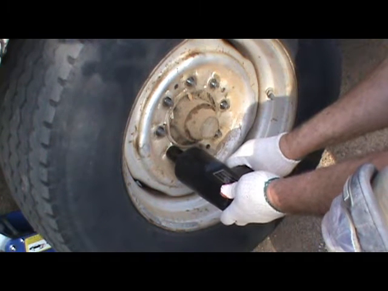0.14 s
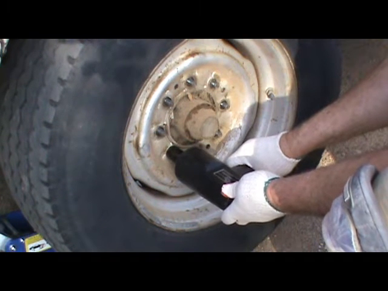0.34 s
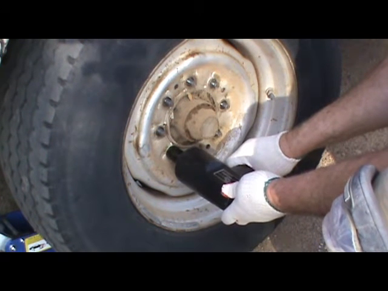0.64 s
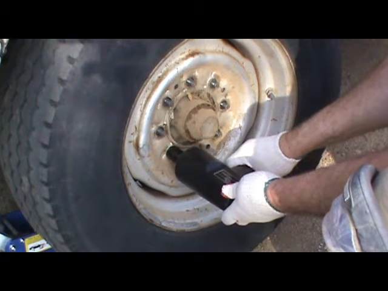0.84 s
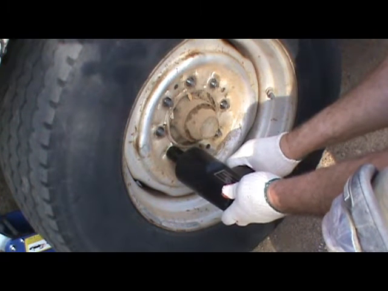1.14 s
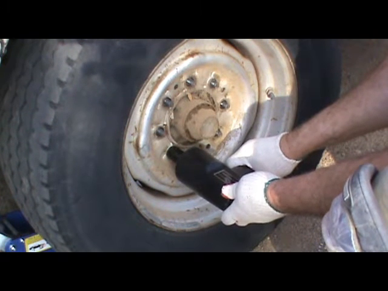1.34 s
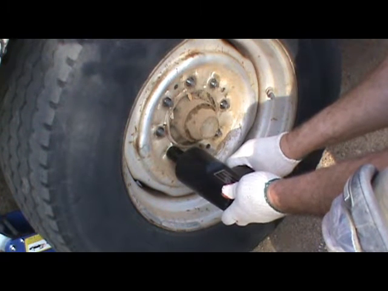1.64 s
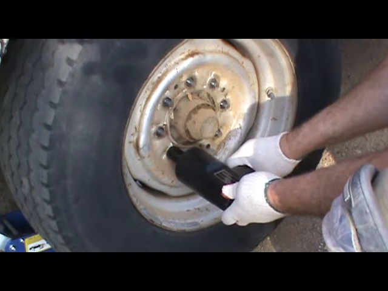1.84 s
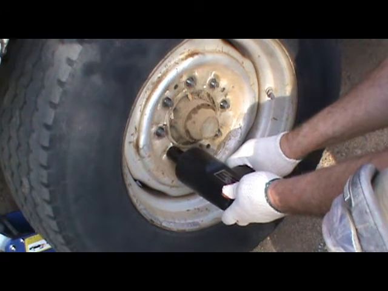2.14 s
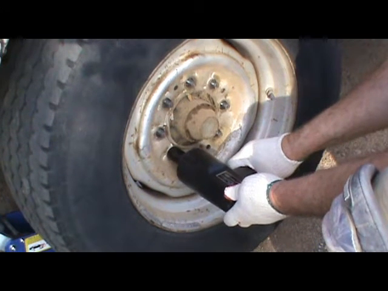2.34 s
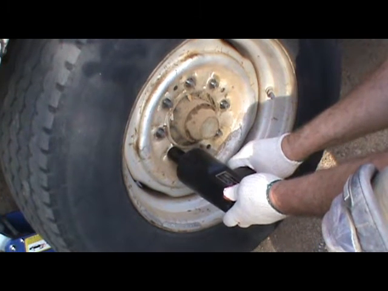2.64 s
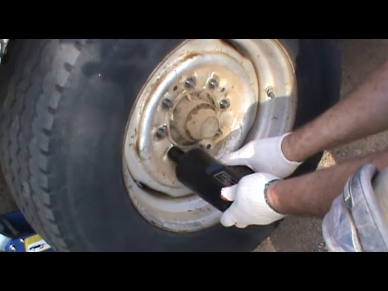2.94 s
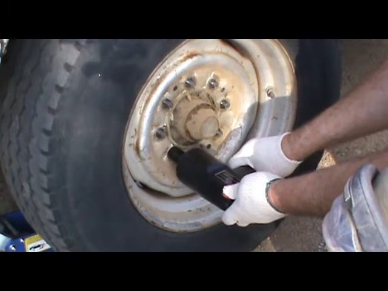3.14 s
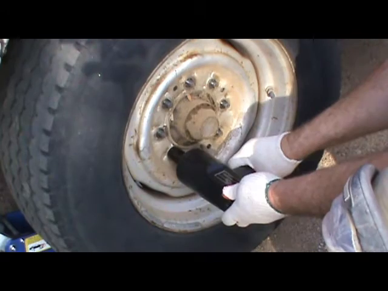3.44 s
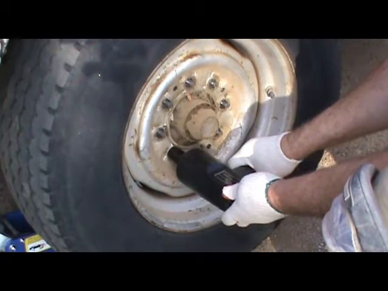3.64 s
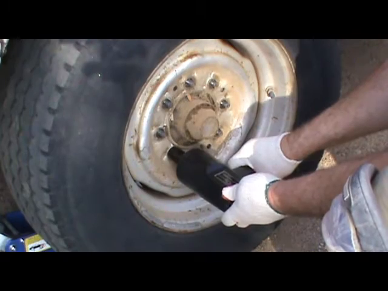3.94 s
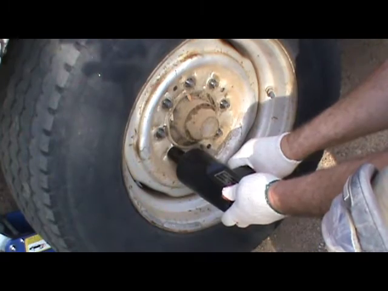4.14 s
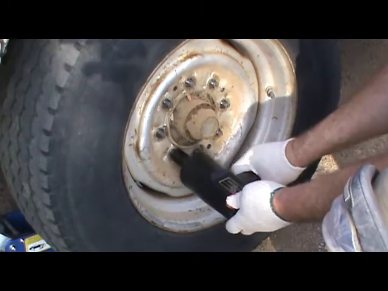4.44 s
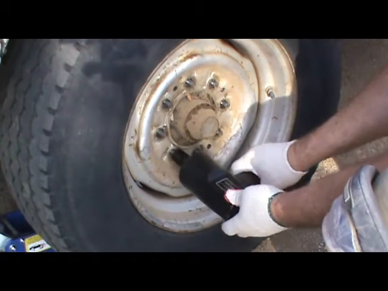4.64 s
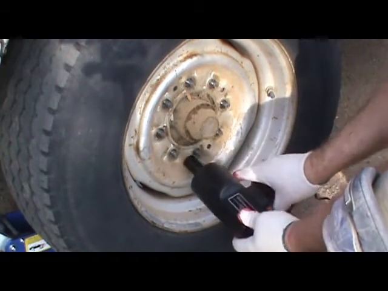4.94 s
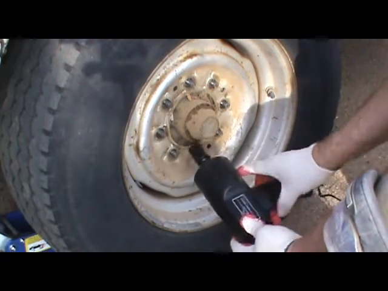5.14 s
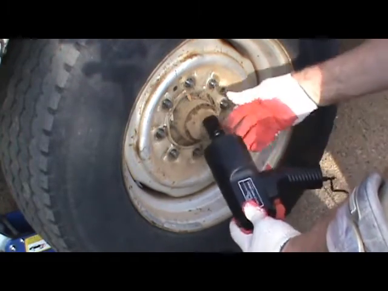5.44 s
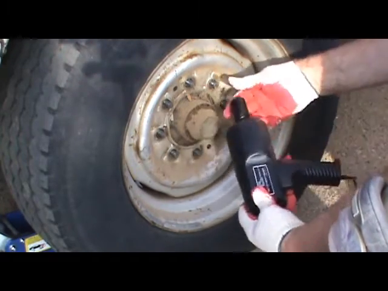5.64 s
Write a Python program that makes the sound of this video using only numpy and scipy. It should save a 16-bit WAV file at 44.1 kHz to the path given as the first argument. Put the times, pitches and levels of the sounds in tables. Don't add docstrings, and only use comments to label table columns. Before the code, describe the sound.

A small stereo microphone sits close to an electric impact wrench on a truck wheel outdoors. From 0 s, already turning, it grinds with slow knocks that quicken into a rough rattle under a rising gear whine and brush hiss. At 1.0 s it stops in a hard, bright hammer blow, and the steel rim rings. The motor immediately gathers speed again, low growl giving way to whine and fast metallic knocking, until a second blow at 2.27 s clangs and thumps the air in the tyre. The ring dies over faint outdoor air and a distant steady hum; trigger clicks snap around 2.85 and 3.0 s. A third wind-up climbs to a blow at 4.22 s that frees the nut. The unloaded tool then whirs with loose slaps and ticks, scrapes off the nut around 4.6 s with a small ping, and coasts from 4.75 s, ringing more openly, slowing but still clattering at the end.

```python
import sys
import numpy as np
from scipy import signal
from scipy.fft import rfft, irfft, next_fast_len
from scipy.io import wavfile
from scipy.ndimage import uniform_filter1d, minimum_filter1d

SR = 44100
rng = np.random.default_rng(int(sys.argv[2]) if len(sys.argv) > 2 else 0)


def level_to_linear(level):
    exponent = np.asarray(level, float) / 20
    return 10 ** exponent


def wrap_up_sound(samples):
    columns = np.atleast_2d(samples).T
    tamed = np.clip(columns, -1, 1)
    steps = np.round(tamed * 32767).astype(np.int16)
    wavfile.write(sys.argv[1], SR, steps)


N = 255780
TIME = np.arange(N) / SR
SIZE = 16 * next_fast_len((N + SR // 2) // 16)
HZ = np.maximum(np.arange(SIZE // 2 + 1) * SR / SIZE, 1)


def rms_one(x):
    return x / np.sqrt(np.mean(x ** 2) + 1e-20)


def at_hz(points):
    hz, value = np.transpose(points)
    return np.interp(np.log(HZ), np.log(np.maximum(hz, 1)), value)


def body_db(spectrum, peaks):
    return at_hz(spectrum) + sum(db / (1 + (2 * (HZ - hz) / width) ** 2) for hz, width, db in peaks)


def colour(x, db):
    short = SIZE // 8
    cepstrum = irfft(np.log(level_to_linear(db[::8] - db.max()) + 1e-6), short)
    cepstrum[1:short // 2] *= 2
    cepstrum[short // 2 + 1:] = 0
    pulse = irfft(np.exp(rfft(cepstrum)), short)
    pulse = pulse / np.sqrt(np.sum(pulse ** 2))
    return irfft(rfft(x, SIZE) * rfft(pulse, SIZE), SIZE)[..., :N]


def noise():
    return rng.standard_normal((2, N))


def drift(rate):
    r = np.exp(-2 * np.pi * rate / SR)
    slow = signal.lfilter([1], [1, -2 * r, r * r], rng.standard_normal(N + SR))
    return rms_one(slow[SR:])


def bump(s, width):
    return np.exp(-((TIME - s) / width) ** 2)


def dying(times, peaks_db, t60):
    marks = np.zeros(N)
    marks[(np.asarray(times) * SR).astype(int)] = level_to_linear(peaks_db)
    return signal.lfilter([1], [1, -level_to_linear(-60 / (t60 * SR))], marks + 1e-18)


def ring(times, peaks_db, modes, spread_db):
    out = 0
    luck = rng.normal(0, 1, (len(times), len(modes)))
    for k, (hz, db, t60) in enumerate(modes):
        marks = np.zeros(N)
        marks[(times * SR).astype(int)] = level_to_linear(peaks_db + db + spread_db * luck[:, k]) * (-1) ** k
        r, w = level_to_linear(-60 / (t60 * SR)), 2 * np.pi * hz / SR
        out = out + signal.lfilter([0, np.sin(w)], [1, -2 * r * np.cos(w), r * r], marks + 1e-18)
    return out


# (frequency [Hz], level [dB per Hz])
AIR = [(15, -37), (25, -6.5), (141, -13), (206, -6.5), (248, 1), (450, -22), (1650, -20), (2530, -30),
       (3150, -20), (6020, -29), (15900, -31)]


def yard():
    air = level_to_linear(-51.5) * colour(noise(), at_hz(AIR))
    hum_db = -50.5 + 1.6 * drift(3.) - 14.0 * (TIME - 2.9) ** 2
    return air + level_to_linear(hum_db) * np.sin(2 * np.pi * 199.2 * TIME)


# (time [s], peak [dB], rise [s], t60 [s], bright share [0-1])
CLICKS = [(2.8255, -31, 0.0006, 0.043, 0.8), (2.85, -18.5, 0.0021, 0.045, 1),
          (2.892, -40, 0.0045, 0.059, 0.07), (2.977, -45, .002, 0.06, 0.6),
          (2.994, -13, 0.0016, 0.034, 0.55), (3.037, -44, 0.003, .04, .6), (3.059, -36, 0.0018, .05, 0.3),
          (1.243, -24.5, 0.0022, 0.057, 0), (1.004, -17, 0.0018, 0.07, 1)]
# (time [s], level [dB], frequency [Hz])
BUMPS = [
    (1.459, -30, 63),
    (1.59, -37, 59),
    (4.4, -44, 81),
    (5.705, -30, 94),
    (4.661, -17, 5900),
]


def clicks():
    plastic = at_hz([(150, -22.0), (500, 5.0), (1200, 8.5), (2500, 5.5), (5000, 4.0),
                     (7000, -6.5), (9500, 1.5), (15000, -21)])
    shapes = np.zeros((2, N))
    for s, db, rise, t60, bright in CLICKS:
        attack = np.exp(np.minimum(TIME - s, 0) / max(rise, 1e-4))
        decay = level_to_linear(-60 * np.maximum(TIME - s, 0) / t60)
        shape = np.where(TIME < s, attack, decay)
        shapes = shapes + level_to_linear(db) * shape * np.sqrt(np.clip([[bright], [1 - bright]], 0, 1))
    octaves = np.log2(HZ / 2000)
    out = colour(noise() * shapes[0], plastic + 1.3 * octaves)
    out = out + colour(noise() * shapes[1], plastic - 3.7 * octaves)
    for s, db, hz in BUMPS:
        out = out + ring(np.array([s]), db, [(hz, 0, .03 + 9. / hz)], 0) * [[1], [.5]]
    return out


# (time [s], width [s], frequency [Hz], level [dB])
SWELLS = [(.05, .05, 1400, -33), (1.45, .06, 960, -30), (.58, 0.044, 970, -27), (.67, 0.024, 1440, -28),
          (.9, .06, 1410, -28), (2.2, 0.058, 1400, -34), (4.24, 0.036, 990, -24), (4.739, .05, 1400, -26),
          (5.2, .05, 1043, -24), (5.19, .04, 1336, -22), (5.2, .075, 2200, -31), (4.92, .075, 2200, -30),
          (5.5, .04, 2140, -33)]


def swells():
    out = np.zeros(N)
    r = np.exp(-np.pi * 70. / SR)
    for s, width, hz, db in SWELLS:
        part = slice(max(int((s - 3 * width) * SR), 0), int((s + 3 * width) * SR))
        sos = [[1, 0, -1, 1, -2 * r * np.cos(2 * np.pi * hz / SR), r * r]] * 2
        tone = rms_one(signal.sosfilt(sos, rng.standard_normal(SR // 2)))
        out[part] += level_to_linear(db) * bump(s, width)[part] * tone[-len(out[part]):]
    return out * [[1], [0]]


# (start [s], end [s], angle of the loose pawl [turns])
WINDS = [
    (-.17, 1.012, .742),
    (1.032, 2.262, .43),
    (2.992, 4.214, .937),
]
# (start [s], speed [turns/s], gain [turns/s per s], pawl angle [turns])
SPIN_OFF = (4.26, 40.7, 5.0, .026)
# (start [s], speed [turns/s], slowing time [s])
COAST = (4.75, 46.65, 2.24)
TOP_TURNS_PER_S, SPIN_UP_S = 80, 1.0


def turning():
    starts = np.array([w[0] for w in WINDS] + [SPIN_OFF[0], COAST[0]])
    stage = np.searchsorted([WINDS[1][0], WINDS[2][0], WINDS[2][1], COAST[0]], TIME)
    age = TIME - starts[stage]
    rise, fall = 1 - np.exp(-age / SPIN_UP_S), np.exp(-age / COAST[2])
    which = [stage < len(WINDS), stage == len(WINDS)]
    spin_speed = SPIN_OFF[1] + SPIN_OFF[2] * age
    speed = np.select(which, [TOP_TURNS_PER_S * rise, spin_speed], COAST[1] * fall)
    wind_turns = TOP_TURNS_PER_S * (age - SPIN_UP_S * rise)
    spin_turns = SPIN_OFF[1] * age + SPIN_OFF[2] * age ** 2 / 2
    turns = np.select(which, [wind_turns, spin_turns], COAST[1] * COAST[2] * (1 - fall))
    ends = np.array([w[1] for w in WINDS[:-1]] + [TIME[-1] + 1] * 3)
    gate = np.clip((ends[stage] - TIME) / 0.0021 + 1, 0, 1)
    return speed, turns, stage, gate


# (multiple of the mesh rate, level [dB])
MESH_ORDERS = [(1, 0), (2, -2)]


def whine():
    speed, _, stage, gate = turning()
    teeth_per_turn = 26.2
    hz = teeth_per_turn * speed
    level_db = np.where(stage < len(WINDS), -33.5, -39)
    level_db = level_db - .045 * np.maximum(1100 - hz, 0)
    turn = np.cumsum(hz * (1 + .003 * drift(30.))) * 2 * np.pi / SR
    once_a_turn = 1 + .4 * np.cos(turn / teeth_per_turn)
    tone = sum(level_to_linear(db + 3 + 2.0 * drift(12.)) * once_a_turn * np.sin(k * turn) for k, db in MESH_ORDERS)
    resonances = at_hz([(600, -10), (900, 0), (1500, 1), (1800, -16), (2200, -4), (2480, 1),
                        (2630, -16), (4000, -20)])
    return colour(gate * level_to_linear(level_db - 5.5) * tone, resonances) * [[1], [1]]


# (time [s], peak [dB])
PINGS_FIRST = [(0.0523, -37), (0.0842, -35), (0.1106, -31), (0.1286, -26), (0.1535, -28), (0.1984, -27),
               (0.2299, -29), (0.2663, -18), (0.3062, -21), (0.3361, -20), (0.3681, -17), (0.398, -24),
               (0.4229, -21), (0.4484, -16), (0.4753, -26), (0.5053, -18), (0.5297, -19), (0.5526, -22),
               (0.5786, -23), (0.6005, -18), (0.619, -22), (0.6449, -21), (0.6734, -20), (0.7143, -22),
               (0.7297, -25), (0.7472, -23), (0.7741, -25), (0.7941, -22), (0.832, -23), (0.8555, -20),
               (0.9118, -20), (0.9862, -20), (1.0036, -8)]
PINGS_NEXT = [(1.1818, -47), (1.2227, -44), (1.2562, -41), (1.2966, -42), (1.323, -38), (1.3529, -38),
              (1.3739, -34), (1.3923, -31), (1.4218, -31), (1.4602, -26), (1.4996, -28), (1.5305, -29),
              (1.5879, -23), (1.6148, -24), (1.6992, -26), (1.7221, -22), (1.7485, -26), (1.77, -21),
              (1.7959, -22), (1.8149, -22), (1.8388, -23), (1.8643, -24), (1.8842, -25), (1.9082, -20),
              (1.9276, -28), (1.9675, -26), (2.0104, -14), (2.0489, -21), (2.0773, -22), (2.1092, -22),
              (2.1671, -24), (2.184, -20), (2.2649, -6)]
PINGS_LAST = [(3.0859, -55), (3.1003, -50), (3.1138, -44), (3.1402, -42), (3.1627, -40), (3.2091, -32),
              (3.231, -39), (3.258, -38), (3.2784, -34), (3.3059, -25), (3.3592, -32), (3.4061, -28),
              (3.4286, -28), (3.4765, -26), (3.5024, -23), (3.5338, -22), (3.5648, -23), (3.5907, -26),
              (3.6177, -25), (3.6416, -26), (3.666, -24), (3.691, -21), (3.7199, -22), (3.7429, -23),
              (3.7638, -22), (3.8122, -22), (3.8292, -22), (3.8551, -23), (3.8771, -20), (3.9005, -20),
              (3.918, -20), (3.9439, -24), (3.9788, -26), (3.9988, -26), (4.0397, -22), (4.0766, -18),
              (4.0946, -19), (4.1145, -18), (4.1365, -21), (4.1704, -21)]
# (frequency [Hz], level [dB], t60 [s])
PAWL = [(7940, -12, .015), (9150, -4, 0.018), (9400, -4, 0.018), (11000, 2, 0.017), (11270, 1.5, 0.018),
        (12600, -10, .02), (13600, -18, .015)]


def pings():
    s, db = np.transpose(list(PINGS_FIRST) + list(PINGS_NEXT) + list(PINGS_LAST))
    bounce_s, bounce_db = .0045, -5
    hits_s, hits_db = np.append(s, s + bounce_s), np.append(db, db + bounce_db)
    return ring(hits_s, hits_db - 6, PAWL, 4.3) * [[1], [1]]


# (place [0-1], level at first [dB], at the end [dB])
COAST_KNOCKS = [(.08, 2, -1), (.24, -4, -7), (0.396, -10, 5), (.565, 5, -17), (.73, 0, 7), (.895, -7, 1)]
# (time [s], peak [dB])
HARD = [(0.2598, -21), (0.3324, -10), (0.3681, -14), (0.4519, -15), (0.619, -11), (0.839, -9), (0.9098, -8),
        (0.9714, -3), (1.494, -15), (1.8387, -5), (1.925, -5), (1.9683, -4), (3.4395, -7), (3.5982, -4),
        (3.6416, -4), (3.96, -5)]
# (time [s], peak [dB])
SLOW_FIRST = [(0.0164, -22), (0.0373, -18.5), (0.1436, -16.5), (0.1887, -20), (0.2244, -17), (0.266, -11)]
SLOW_NEXT = [(1.2226, -19), (1.2441, -24), (1.2821, -25), (1.314, -22), (1.373, -16), (1.4207, -13),
             (1.4557, -16)]
SLOW_LAST = [(3.0574, -25), (3.0803, -36), (3.0998, -29), (3.1132, -23), (3.1392, -20), (3.1621, -19),
             (3.207, -18), (3.2265, -22), (3.2694, -15), (3.328, -11.5), (3.3552, -14.5), (3.3971, -16)]


def rattle(speed, turns, stage, gate, grind_db):
    angle = np.array([w[-1] for w in WINDS] + [SPIN_OFF[-1], 0])[stage]
    same = (np.diff(stage) == 0) & (gate[1:] > .5)
    passes = np.diff(np.floor(turns - angle)) > 0
    at = [np.flatnonzero(passes & same & (TIME[1:] < COAST[0]))]
    extra = [np.zeros(len(at[0]))]
    for place, first_db, last_db in COAST_KNOCKS:
        passes = np.diff(np.floor(turns / 2 - place)) > 0
        at.append(np.flatnonzero(passes & same & (TIME[1:] > COAST[0])))
        extra.append(np.interp(TIME[at[-1]], [COAST[0], TIME[-1]], [first_db, last_db]))
    at, extra = np.concatenate(at), np.concatenate(extra)
    luck = rng.normal(0, 1, (400, 2))[:len(at)]
    lead_s, jitter_s, spread_db = 0.0041, 0.00091, 2
    s = np.clip(TIME[at] - lead_s + jitter_s * luck[:, 0], 0, TIME[-1] - .01)
    peak_db = grind_db[at] + 6.5 + extra + spread_db * luck[:, 1]
    peak_db = peak_db - 9 * np.exp(-speed[at] / 20)
    peak_db = peak_db + 1.5 * (stage[at] >= len(WINDS))
    slow = [(t, db + 4) for t, db in list(SLOW_FIRST) + list(SLOW_NEXT) + list(SLOW_LAST)]
    hard_s, hard_db = np.transpose(list(HARD) + slow)
    taken = np.append(hard_s, [row[0] for row in list(SLAPS) + list(SLAPS_LATE)])
    clear = abs(s[:, None] - taken).min(axis=1) > .009
    clear = clear & (speed[at] > 27)
    return np.append(s[clear], hard_s), np.append(peak_db[clear], hard_db - 1.5)


WIND_DB = [-0.06, -0.5, 0]
COLD = [0.4, 0.4, 0.67]
# (time [s], grind level [dB])
FREE_LOAD = [(4.22, -21.5), (4.43, -19.5), (4.6, -19), (4.72, -16), (4.9, -19.5), (5.2, -18.5), (5.44, -22),
             (5.5, -20), (5.62, -24)]
# (time [s], width [s], level [dB])
SCRAPE = (4.57, 0.15, 7.2)
# (time [s], level [dB])
JOLTS = [(1.44, 14), (2.25, 9), (4.4, 16), (5.71, 14)]


def levels():
    speed, turns, stage, gate = turning()
    winding = stage < len(WINDS)
    share = np.maximum(speed / TOP_TURNS_PER_S, 1e-4)
    cold = np.take(COLD, stage, mode="clip")
    share = np.maximum(share, 0.095 * (1 - cold))
    wind_db = -12 + 24.5 * np.log10(share) + np.take(WIND_DB, stage, mode="clip")
    wind_db = wind_db - cold * 4 * np.exp(-share / 0.081)
    grind_db = np.where(winding, wind_db, np.interp(TIME, *np.transpose(FREE_LOAD)))
    brush_db = -8.5 - cold * 33 * np.exp(-share / 0.14)
    hiss_db = np.where(winding, brush_db, -12.5 + SCRAPE[2] * bump(*SCRAPE[:2]))
    growl_db = np.where(winding, -2 - 20.5 * share, -13)
    rumble_db = -58.5 + sum(db * bump(s, .06) for s, db in JOLTS)
    return grind_db, hiss_db, growl_db, rumble_db, gate, rattle(speed, turns, stage, gate, grind_db)


def tooth_contacts(gate, grind_db):
    chatter_db = np.minimum(rng.exponential(1, 900), 3.5) - 9.0
    chatter = dying(rng.uniform(0, TIME[-1], 900), chatter_db, 0.0066)
    teeth = rms_one(0.76 + uniform_filter1d(chatter, size=60))
    teeth = gate * level_to_linear(grind_db - 1.5 + 0.5 * drift(38.0)) * teeth
    return teeth * level_to_linear(1.8 * np.minimum(drift(160.), 2) - .3)


# (frequency [Hz], level [dB per Hz])
ON_NUT = [(470, -45), (800, -8), (868, -17), (977, -1.5), (1190, -7), (1420, -0.5), (1640, -11),
          (1910, -3.5), (2440, -7), (3060, -9), (4450, -10), (7000, -24.5), (9100, -20), (15400, -120)]
# (frequency [Hz], level [dB per Hz])
IN_AIR = [(470, -39), (800, -11.5), (1030, 2), (1150, 1), (1370, -2.5), (1620, -5), (2170, 1.5), (2820, -5),
          (4490, -3.5), (5190, -11), (5840, -10), (7000, -20), (9100, -19), (15400, -120)]
# (time [s], share [0-1])
LIFT_OFF = [(4.7, 0.0056), (4.8, 1), (5.5, 0.96), (5.66, 0.56)]
# (frequency [Hz], width [Hz], level [dB])
HOUSING = [(983, 24, 4.5), (1376, 35, 4), (2090, 50, -2), (4600, 380, 4), (9370, 200, 2), (11000, 300, -2),
           (12500, 200, 5)]
# (frequency [Hz], width [Hz], level [dB])
BARREL = (2190, 57, 7)


def through_housing(drive):
    free = np.interp(TIME, *np.transpose(LIFT_OFF))
    gripped = colour(drive * np.sqrt(1 - free), body_db(ON_NUT, HOUSING))
    return gripped + colour(drive * np.sqrt(free), body_db(IN_AIR, HOUSING + [BARREL]))


# (time [s], peak [dB], bright part [dB])
SLAPS = [(4.2665, -5, -20), (4.3094, -12, -19), (4.3312, -2, -12), (4.3546, -7, -11), (4.3771, -8, -15),
         (4.426, -5, -20), (4.4529, -9.5, -16), (4.4788, -8, -8), (4.573, 3, -20), (4.5951, -20, -22),
         (4.617, -4, -15), (4.641, -13, -13), (4.6609, -14, -12), (4.7113, -12, -15), (4.774, -17, -19),
         (4.7826, 0, -18), (4.8156, -9.5, -20), (4.8405, -5, -21), (4.862, -5, -17), (4.8829, -5, -15),
         (4.9059, -4, -16), (4.9307, -5, -20), (4.952, 1, -17), (5.0011, -7, -20)]
SLAPS_LATE = [(5.0013, -8, -21), (5.025, -8, -22), (5.0318, -7, -20), (5.048, -5, -15), (5.0735, -13, -17),
              (5.0996, -6, -21), (5.125, -11, -19), (5.156, -8, -20), (5.1804, -9, -15), (5.2345, -7, -18),
              (5.2827, 1, -22), (5.3361, -2, -19), (5.373, -6, -20), (5.3944, -7.5, -13),
              (5.4104, -11, -14), (5.4294, -13, -15), (5.482, -16, -18), (5.4892, -10, -16),
              (5.5122, -8, -14), (5.5494, -10.5, -19), (5.572, -10, -18), (5.59, -14, -14),
              (5.6123, -9.5, -18), (5.6336, -10.5, -17), (5.6553, -2, -16), (5.6753, -12, -15),
              (5.7017, -8, -15), (5.7207, -17, -14), (5.7406, -10, -16), (5.7536, -9, -15),
              (5.7671, -6.5, -18)]
# (time [s], peak [dB])
TICKS = [(4.2668, -21), (4.3097, -23), (4.3316, -16), (4.3545, -14.5), (4.378, -17), (4.4254, -21),
         (4.4539, -22), (4.4807, -13), (4.5043, -16), (4.5247, -14), (4.5896, -20), (4.616, -16),
         (4.6404, -15), (4.6624, -15), (4.6893, -14), (4.7432, -20), (4.7821, -22), (4.833, -22),
         (4.8979, -17), (4.9642, -20), (5.0321, -20), (5.0745, -20), (5.0989, -19), (5.1573, -20),
         (5.1807, -22), (5.2082, -25), (5.2291, -16), (5.263, -19), (5.2825, -20), (5.2989, -19),
         (5.3164, -21), (5.3364, -21), (5.3538, -19), (5.374, -12), (5.4102, -15), (5.4306, -17),
         (5.4686, -25), (5.49, -12), (5.5299, -19), (5.5494, -20), (5.5718, -19), (5.5903, -13),
         (5.6127, -18), (5.6542, -9), (5.6756, -18), (5.707, -17), (5.721, -16), (5.7404, -17),
         (5.7529, -17), (5.7878, -16)]
# (frequency [Hz], level [dB per Hz])
TICK_COLOUR = [(4000, -20), (6000, 0.5), (7000, -4.5), (10000, -3), (11000, -4.5), (13000, -11.5),
               (15000, -12), (15900, -19)]
# (frequency [Hz], level [dB per Hz])
HISS = [(3530, -48), (6000, 3), (6810, -26), (7420, 0.5), (8380, -5.5), (9130, 2.5), (10200, 0),
        (11300, 1.5), (14000, -11.5), (15200, -15), (15900, -30)]
# (frequency [Hz], level [dB per Hz])
GROWL = [(88, -61.5), (150, -27.5), (291, -15), (328, -9.5), (618, -5.5), (840, -11.5), (956, -4.5),
         (1420, -3.5), (1600, -15), (2080, -24.5), (3520, -120)]
# (frequency [Hz], level [dB], t60 [s])
GEARBOX = [(990, -8, .04), (1400, -5, .04), (2200, -1, .04), (3050, -3, .025), (4450, -2, .02)]


def motor():
    grind_db, hiss_db, growl_db, rumble_db, gate, (s, peak_db) = levels()
    peak_db = np.minimum(peak_db, -4)
    bursts = uniform_filter1d(dying(s + .001, peak_db, .034), size=170)
    teeth = tooth_contacts(gate, grind_db)
    freed = TIME > SPIN_OFF[0]

    tick_s, tick_db = np.transpose(TICKS)
    slap_s, slap_db, bright_db = np.transpose(list(SLAPS) + list(SLAPS_LATE))
    slaps = uniform_filter1d(dying(slap_s, slap_db - 8.0, 0.045), size=120)
    sparks = dying(slap_s, slap_db + bright_db - 8.0, .025) + dying(tick_s, tick_db - 5, .025)
    sparks = uniform_filter1d(sparks, size=120)

    drive = teeth * level_to_linear(-0.3 * freed) + slaps + level_to_linear(-17.5 + 4.8 * freed) * bursts
    grind = through_housing(noise() * drive)
    knock_colour = at_hz([(1000, -30), (2500, -3), (4500, 0), (6500, -5), (9000, -8), (12000, -14),
                          (15000, -27)])
    knock = colour(noise() * bursts * level_to_linear(-12.5), knock_colour)
    brushes = level_to_linear(-2.5) * teeth * level_to_linear(1.8 * drift(78.0)) + level_to_linear(-16.0) * bursts
    hiss = colour(noise() * level_to_linear(hiss_db) * brushes, body_db(HISS, HOUSING))
    growl = colour(noise() * level_to_linear(growl_db + 8.0) * teeth, at_hz(GROWL))
    rumble = colour(noise(), at_hz([(20, -12), (60, -1.0), (150, 4.0), (220, -0.5), (400, -29.0)]))
    rumble = rumble * level_to_linear(rumble_db + 3.9 * drift(11.0))
    ticks = colour(noise() * (sparks + level_to_linear(-18.0) * teeth * freed), at_hz(TICK_COLOUR))
    gear_db = np.append(peak_db - 20, slap_db - 15)
    gears = ring(np.append(s + .002, slap_s), gear_db, GEARBOX, 4.0) * [[1], [.5]]
    return gears + grind + knock + ticks + hiss + growl + gate * rumble


# (time [s], snap [dB], clang [dB], ring [dB], tyre thump [dB])
BLOWS = [
    (1.0158, -5, -8, -21, -41),
    (2.2662, -9.5, -9, -24.5, -22.5),
    (4.2176, -12, -13, -30, -35.5),
]
# (frequency [Hz], level [dB per Hz])
SNAP = [(300, -23), (1000, -23), (2500, -8.5), (4500, 13.5), (7000, 6), (9500, 11.5), (12500, 1),
        (15500, -19)]
# (frequency [Hz], level [dB per Hz])
CRACK = [(88, -17), (150, -13.5), (977, 7), (1620, -3.5), (1820, 5), (2970, -1), (4470, 1.5), (7010, -9.5),
         (9210, -3.5), (15900, -34)]
RIM_HZ = [533, 807, 900, 1061, 1200, 1459, 1707, 1814, 2150, 2272, 2422, 2482, 2902, 3165, 3311, 3887, 4032,
          4269, 4565, 5044, 5184, 5335, 5766, 8053, 8899, 10000, 11620]
# (level at the first blow [dB], level at later blows [dB], t60 [s])
RIM = [(-11, -4, 0.81), (-23, -10, 0.92), (-31.5, -12.5, 0.76), (-41, -8, 0.66), (-25, 8.5, 0.23),
       (-28, -20, 0.9), (-20, -22, 2.6), (-28, -25, 0.31), (-6, -18, 0.75), (-3, -3, 0.3), (-14, -9, 0.65),
       (-11, -18, 0.37), (-21, -17, 0.92), (-19, -16, 1.02), (-14, -18, .8), (-19, -25, 1.6),
       (11.5, -17, 0.14), (-19, -24, 1), (-7, -22, 0.35), (-14, -14, 0.65), (-13, -14, 0.5),
       (-24, -15, 0.26), (-26, -19, .3), (-12, -25, 0.11), (13, -14, 0.16), (-9, -4, .08), (-12, 2, .09)]
# (frequency [Hz], level [dB], t60 [s])
TYRE = [(81.2, -1.5, 1), (137, -3, 0.46), (177.3, 2, 0.46), (247, 1, 0.46), (298, -5, 0.74), (348, -29, .6),
        (455, 15.5, 0.21)]


def blows():
    s, snap_db, clang_db, ring_db, thump_db = np.transpose(BLOWS)
    hammer = dying(s, snap_db, 0.046) + dying(s + .011, snap_db - 4.0, 0.038)
    snap = colour(noise() * hammer, at_hz(SNAP))
    clang = colour(noise() * dying(s, clang_db, 0.24), at_hz(CRACK))
    tail = colour(noise() * dying(s, clang_db - 26, 0.91), at_hz(CRACK) - 2.2 * np.log2(HZ / 1000))
    first_db, later_db, t60 = np.transpose(RIM)
    metal = ring(s[:1], ring_db[:1], np.column_stack([RIM_HZ, first_db, t60]), 0)
    metal = metal + ring(s[1:], ring_db[1:], np.column_stack([RIM_HZ, later_db, t60]), 0.61)
    low = at_hz([(40, -30), (80, -2), (300, 10.5), (500, -5.5), (750, -7), (1100, -43)])
    shudder = colour(noise() * dying(s + 0.02, thump_db + 1.0, 0.96), low)
    tyre = ring(s + 0.0121, thump_db - 9.5, TYRE, 1.8)
    return snap + clang + tail + shudder + (metal * level_to_linear(1.2 * drift(8.)) + tyre) * [[1], [.7]]


# (frequency [Hz], lead [radians])
LEAD = [(30, .5), (260, 1.), (520, 1.1), (1120, .9), (1640, .8), (1890, .45), (2500, .2), (4480, .3),
        (6460, .3), (8000, .05), (15600, 0)]
# (frequency [Hz], difference [dB])
TILT = [(60, .5), (200, 1.8), (400, 2.4), (700, 2), (1300, 2.9), (2400, 2), (4400, .8), (8000, .5),
        (15000, 0)]
# (frequency [Hz], level [dB])
DIFFUSE = [(30, -3), (80, -8), (200, -19), (1000, -18), (3000, -14), (6000, -14), (10000, -20),
           (15000, -27)]


def scene():
    sources = yard() + clicks() + swells() + whine() + pings() + motor() + blows()
    direct, diffuse = rfft(sources, SIZE)
    half = level_to_linear(at_hz(TILT) / 2) * np.exp(.5j * at_hz(LEAD))
    side = diffuse * level_to_linear(at_hz(DIFFUSE))
    return irfft([direct * half + side, direct / half - side], SIZE)[:, :N]


def roll_off(x):
    return signal.sosfilt(signal.butter(12, 16060, fs=SR, output="sos"), x)


def record(dry):
    over = np.maximum(20 * np.log10(abs(dry).max(axis=0) + 1e-9) + 3, 0)
    slope = 260.0 * TIME
    held = np.maximum.accumulate(over + slope) - slope
    ahead = round(.003 * SR)
    duck = uniform_filter1d(-minimum_filter1d(-held, 2 * ahead + 1), size=ahead // 2 + 1)
    cut = signal.ellip(10, .1, 70, 15900, fs=SR, output="sos")
    return roll_off(signal.sosfilt(cut, dry * level_to_linear(-duck)))


dry = scene()
out = record(dry)
wrap_up_sound(out)
```